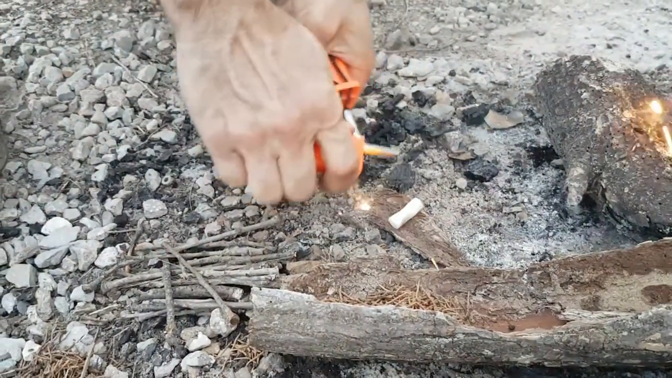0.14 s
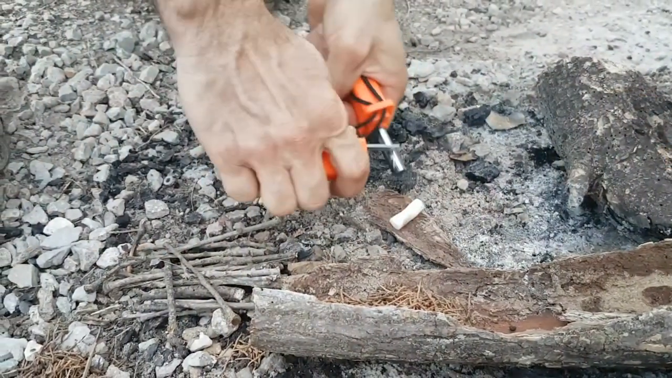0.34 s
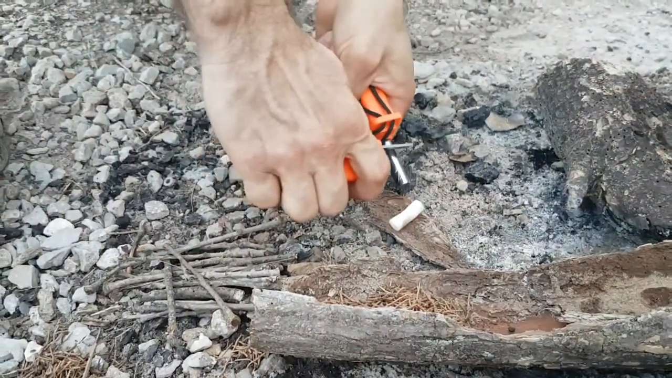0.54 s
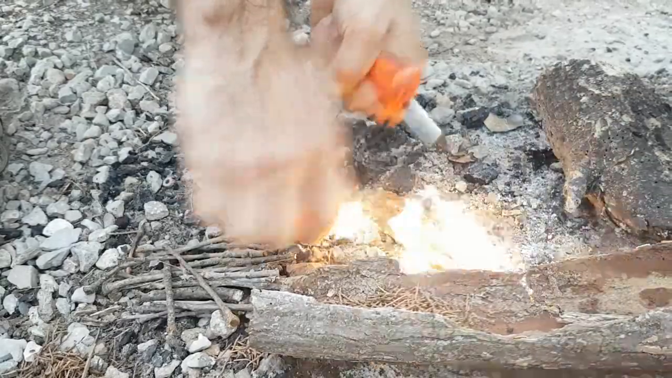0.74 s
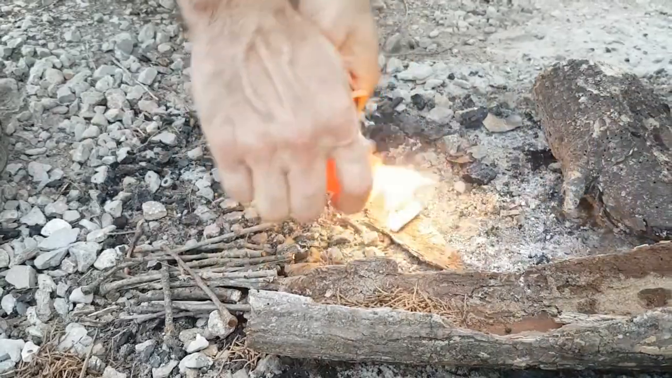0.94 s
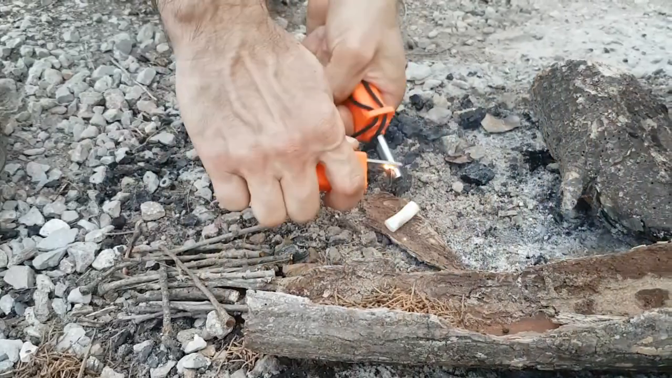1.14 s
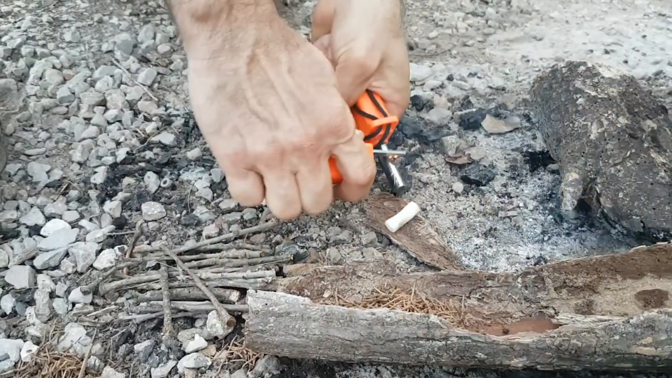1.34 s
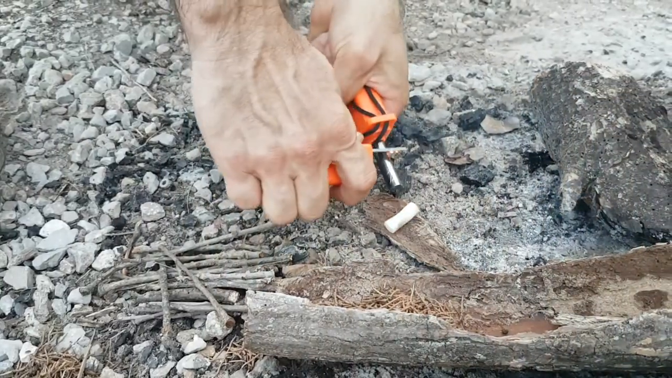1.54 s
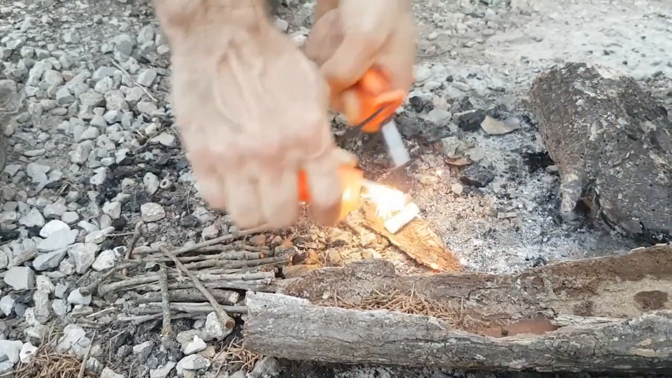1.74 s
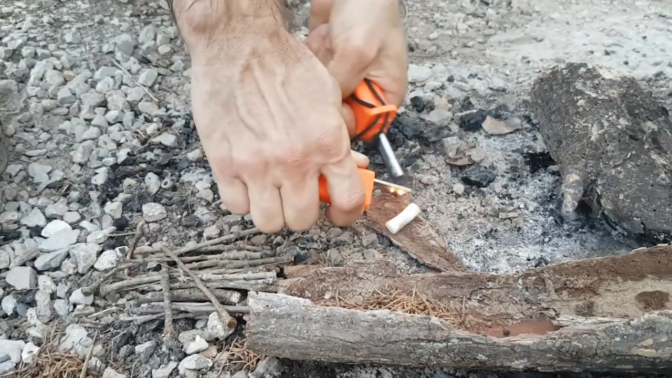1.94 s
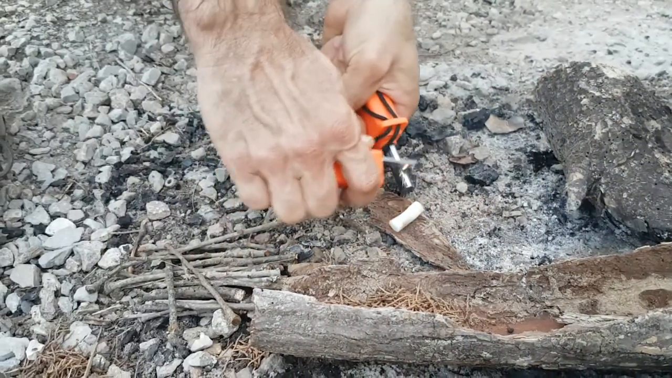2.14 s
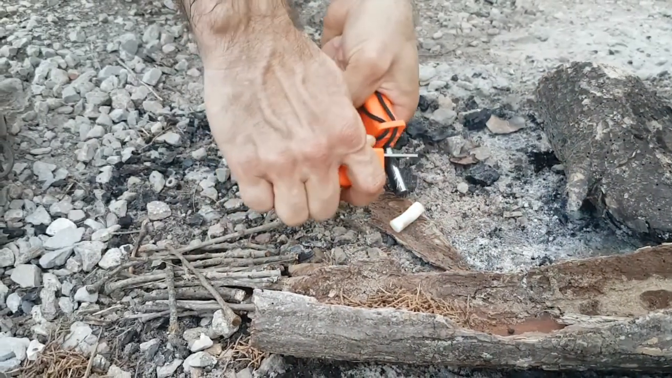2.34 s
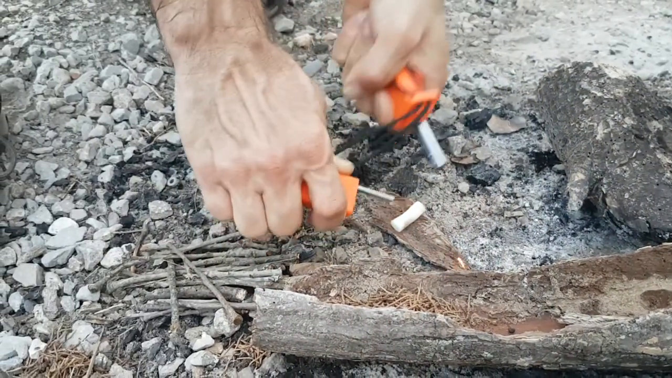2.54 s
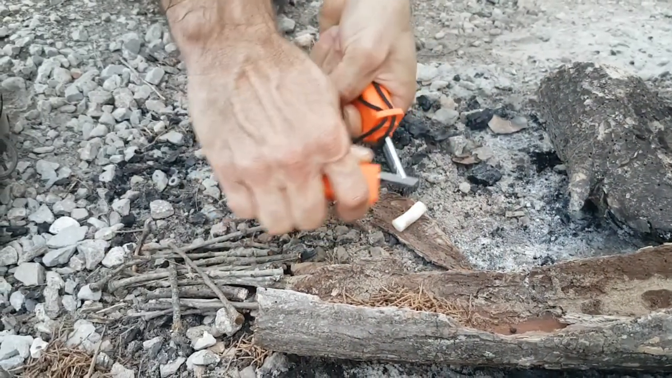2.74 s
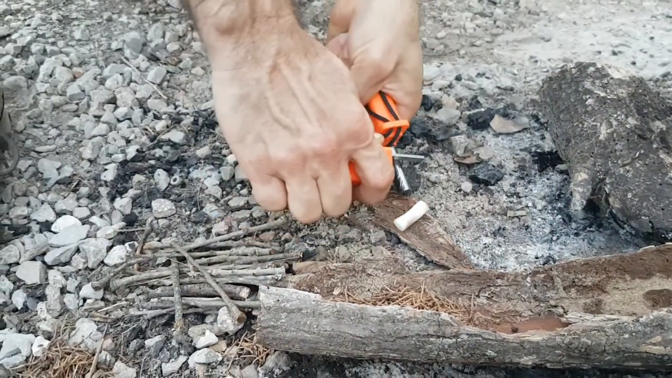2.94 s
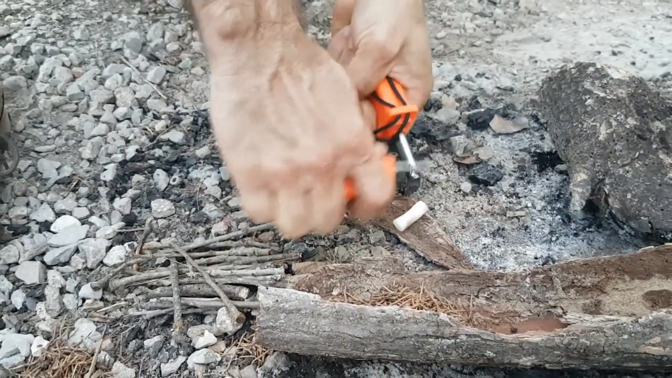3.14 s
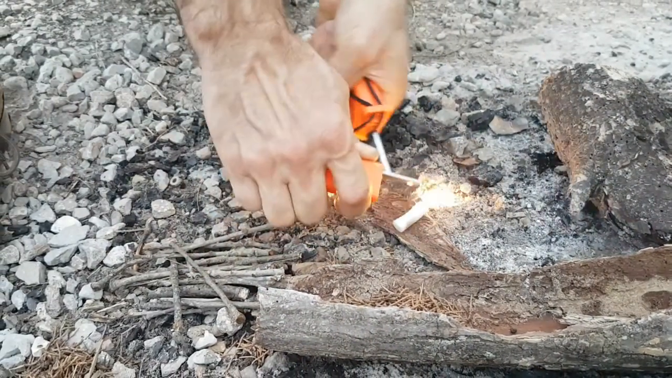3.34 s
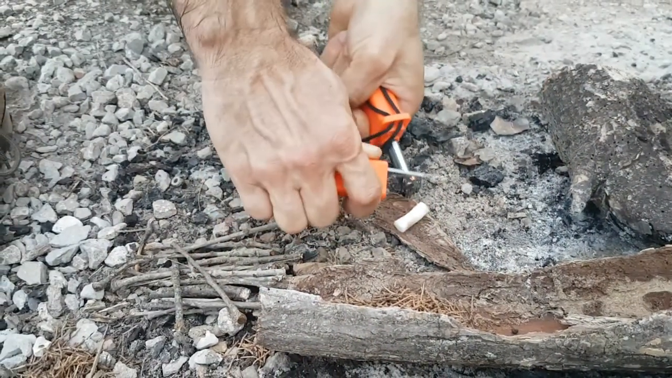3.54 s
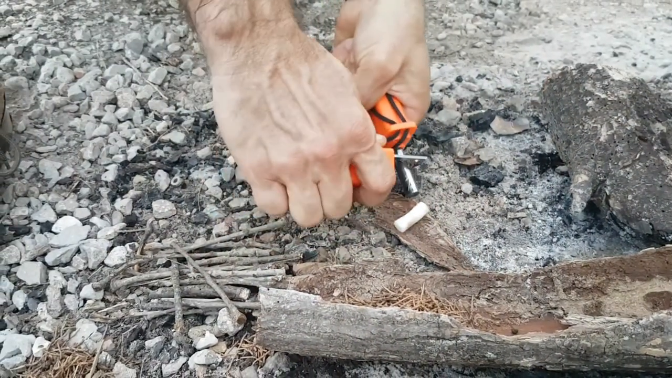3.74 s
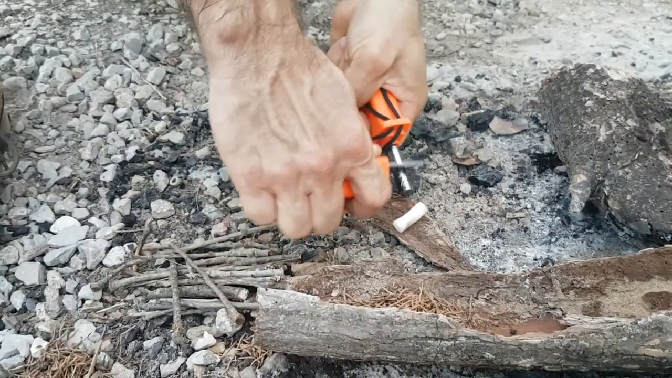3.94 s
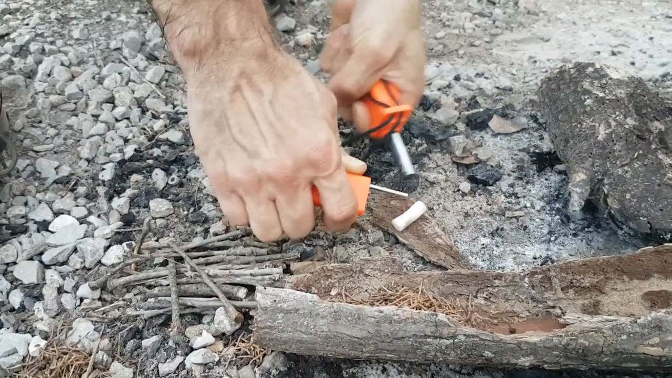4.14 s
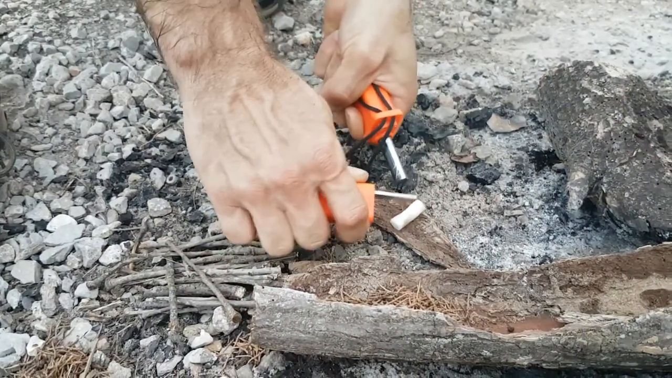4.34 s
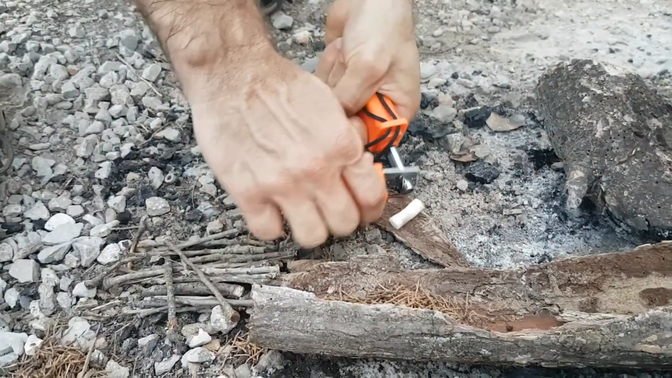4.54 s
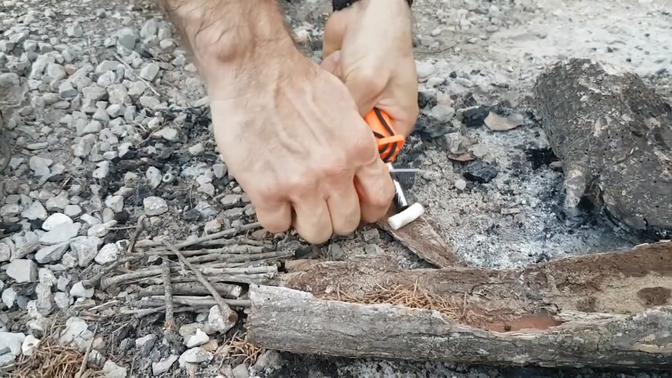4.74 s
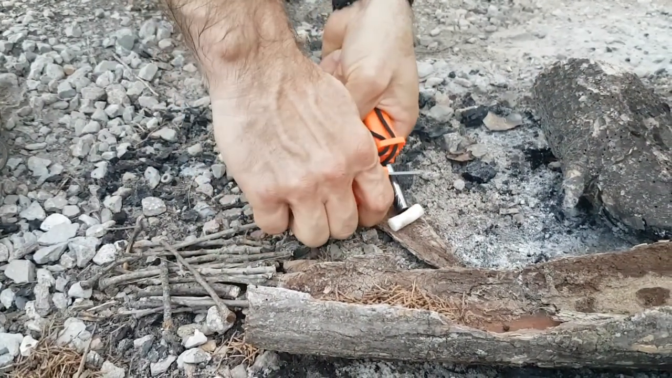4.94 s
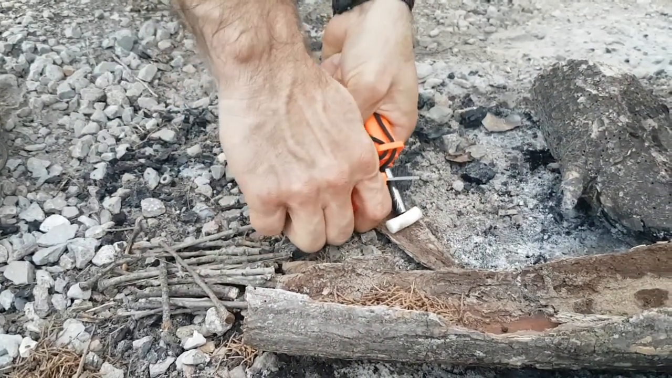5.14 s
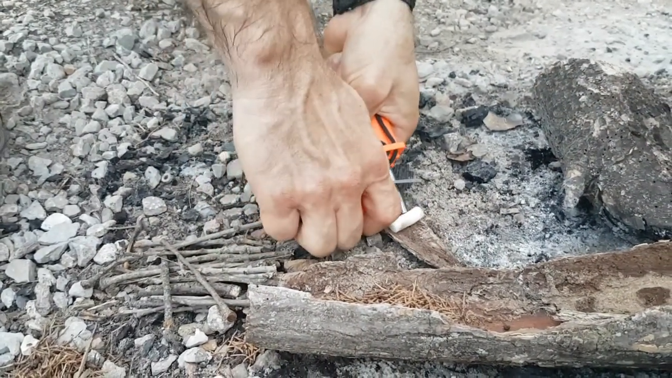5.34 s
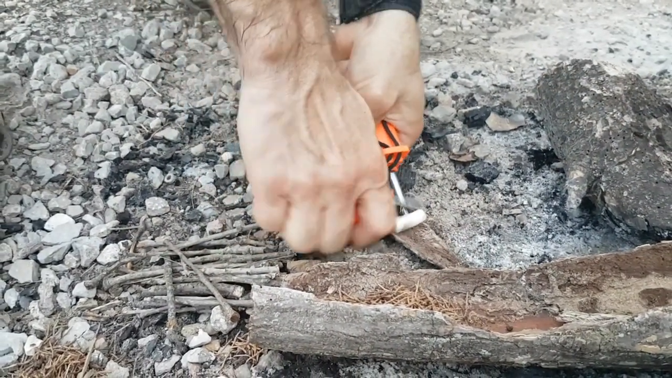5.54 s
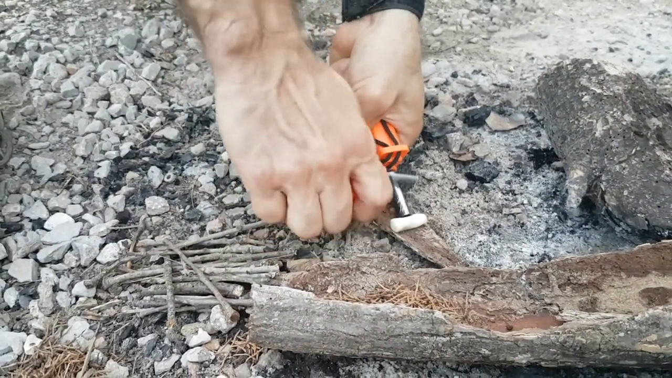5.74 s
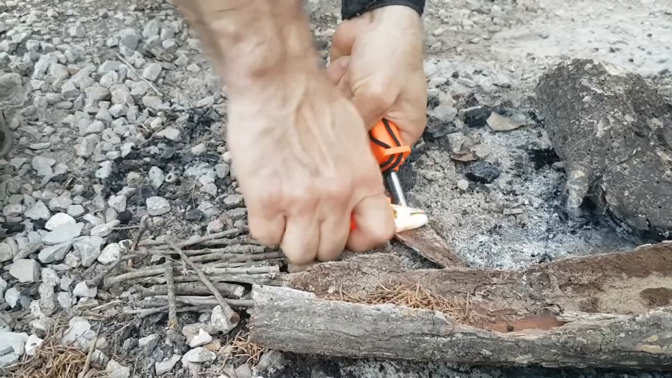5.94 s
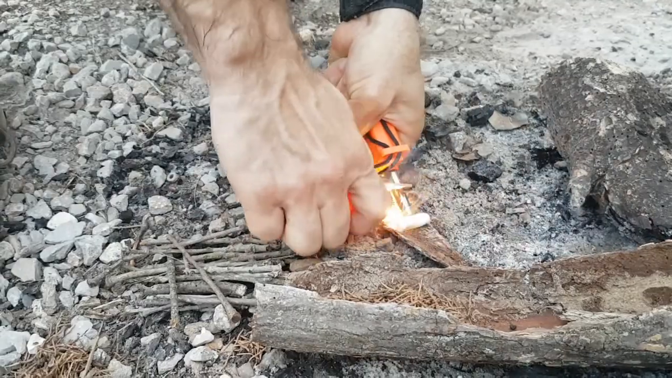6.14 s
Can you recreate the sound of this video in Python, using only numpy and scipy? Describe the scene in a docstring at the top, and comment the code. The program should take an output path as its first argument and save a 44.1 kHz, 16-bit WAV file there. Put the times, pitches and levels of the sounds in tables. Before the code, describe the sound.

Dry, loud metallic rasps, tens of milliseconds long, burst from a fire rod close to a stereo microphone, the loudest peaks slightly clipped. Each runs up to a snap and brief sputtering sparks. Small steel ticks and gritty handling noises fill the gaps. The open-air background holds a low engine drone, a swelling high insect chorus with a fast pulsed buzz, faint thin whistles and soft low air noise.

```python
"""At a cold fire pit a fire steel is struck again and again, close to the microphone, whose loudest peaks clip.
The striker ticks onto the rod, rasps along it and snaps off the tip: noise and grains ring steel and handles.
Shavings fizz and sputter as sparks (coloured grains), and the tools rub as they are lined up.
An engine idles some way off (sine lines of its cycle); insects shrill all round (coloured noise and a pulsed
buzz), with two thin whistles and a bed of low air noise."""
import sys
import numpy as np
from scipy import signal
from scipy.fft import rfft, irfft
from scipy.io import wavfile

SR = 44100
rng = np.random.default_rng(int(sys.argv[2]) if len(sys.argv) > 2 else 0)


def output_pcm(signal):
    """Save a mono or channel-first signal as 16-bit PCM at the path in sys.argv[1].

    Samples are clipped to [-1, 1] before scaling.
    """
    pcm = np.clip(np.atleast_2d(signal).T, -1, 1) * 32767
    wavfile.write(sys.argv[1], SR, np.round(pcm).astype(np.int16))


N = 277389
TIME = np.arange(N) / SR
BIN_HZ = np.arange(N // 2 + 1) / TIME[-1]


def from_db(db):
    """Amplitude ratio of a level in dB."""
    return 10 ** (np.asarray(db) / 20)


def rms_one(x):
    """Scale to rms 1 over all channels."""
    return x / np.sqrt(np.mean(x ** 2) + 1e-20)


def in_time(rows):
    """Interpolate each column of a (time [s], ...) curve at every sample."""
    time_s, *columns = np.transpose(rows)
    return [np.interp(TIME, time_s, column) for column in columns]


def panned(left_db):
    """Gains of the two channels for a left-right level difference."""
    return from_db([[left_db / 2], [-left_db / 2]])


def drift(rate_hz):
    """Low-passed noise of rms 1 that changes about rate_hz times a second."""
    spectrum = rfft(rng.standard_normal(N))
    return rms_one(irfft(spectrum / (1 + (BIN_HZ / rate_hz) ** 4), N))


def resonate(x, modes):
    """Parallel two-pole resonances (centre [Hz], width [Hz], level [dB]) with alternating signs."""
    out = 0
    for k, (hz, width_hz, db) in enumerate(modes):
        radius = np.exp(-np.pi * width_hz / SR)
        poles = [1, -2 * radius * np.cos(2 * np.pi * hz / SR), radius ** 2]
        ringing = signal.lfilter([1, 0, -1], poles, x + 1e-18)
        out = out + (-1) ** k * from_db(db) * (1 - radius ** 2) / 2 * ringing
    return out


def gliding(x, hz, width_hz):
    """A resonance whose centre follows the curve hz: shift down, low-pass, shift back; rms 1."""
    turn = np.exp(2j * np.pi * np.cumsum(hz) / SR)
    lowpass = signal.butter(2, width_hz / 2, fs=SR, output="sos")
    return rms_one((signal.sosfilt(lowpass, x / turn) * turn).real)


def coloured(x, spectrum):
    """Shape a white signal by (frequency [Hz], density [dB per Hz]); rms 1."""
    points_hz, points_db = np.transpose(spectrum)
    db = np.interp(np.log(BIN_HZ + 1), np.log(points_hz), points_db)
    return rms_one(irfft(rfft(x) * from_db(db), N))


MIC_SPACING_M = 0.23


def diffuse():
    """White noise from all round: alike at both microphones only for long waves."""
    alike = np.sinc(2 * BIN_HZ * MIC_SPACING_M / 343)  # 343 m/s: speed of sound
    mid, side = rfft(rng.standard_normal((2, N)))
    return irfft(np.sqrt(1 + alike) * mid + np.sqrt(1 - alike) * side * [[1], [-1]], N)


def grains(per_s, spread_db, scatter):
    """Random tiny fractures of uneven size, plus scatter off the stones that differs on each side; rms 1."""
    sizes = from_db(spread_db * np.minimum(rng.exponential(1, N), 4)) * rng.choice([-1, 1], N)
    fractures = rms_one(sizes * (rng.random(N) < per_s / SR))
    return rms_one(fractures + scatter * rng.standard_normal((2, N)))


def swell(peak_s, db, rise_s, fade_s):
    """Envelope of a burst that grows and dies exponentially."""
    decay = np.maximum((peak_s - TIME) / rise_s, (TIME - peak_s) / fade_s)
    return from_db(db) * np.exp(-np.minimum(decay, 20))


def together(envelopes):
    """Unrelated bursts add in power."""
    return np.sqrt(sum(e ** 2 for e in envelopes))


def arches(rows):
    """Envelope of rounded swells (middle [s], length [s], level [dB])."""
    return together(from_db(db) * np.sqrt(np.maximum(1 - (2 * (TIME - middle_s) / length_s) ** 2, 0))
                    for middle_s, length_s, db in rows)


def smooth_step(time_s, width_s):
    """Rise from 0 to 1 round time_s."""
    return .5 + .5 * np.tanh((TIME - time_s) / (2 * width_s))


# air noise spectrum: (frequency [Hz], density [dB per Hz])
AIR_COLOUR = [(20, -21), (32, -20), (45, -19), (58, -9), (100, -6.5), (180, -3.5), (300, -12), (500, -17.5),
              (800, -15.5), (1300, -27), (2200, -31), (4000, -25), (10000, -41), (16000, -36.5)]


def air(level_db=-33.0):
    """Steady diffuse noise, strongest in the bass."""
    return from_db(level_db) * coloured(diffuse(), AIR_COLOUR)


# firing rate of the four-cylinder engine: (time [s], rate [firings per s])
FIRING_RATE = [(0, 72.1), (6.29, 71.2)]
# firing tone, before firing_gain_db: (time [s], level [dB])
FIRING_LEVEL = [(0.0, -37), (0.05, -35), (0.21, -36.5), (0.46, -31), (0.51, -37), (2.24, -32.5),
                (2.29, -36), (2.71, -30), (3.24, -34), (3.28, -31.5), (3.73, -31), (3.85, -36.5),
                (4.75, -30.5), (4.99, -41.5), (5.46, -30), (6.29, -46)]
# exhaust lines: (multiple of the cycle rate [-], relative level [dB])
EXHAUST_LINES = [(5, -33), (7, -10.5), (8, -1.5), (9, -2.5), (11, -3), (12, -4), (13, -6.5), (15, -12.5),
                 (16, -18), (19, -25), (20, -19)]
EXHAUST_DB, EXHAUST_SINK_DB_PER_S = -29, 0.85  # overtones slowly recede
IDLE_WAVER = .17  # share by which each line wanders, rms


def engine(firing_gain_db=-0.25):
    """Four firings a cycle; the chuff of one stronger cylinder fills in lines between the firing harmonics."""
    firing_hz, = in_time(FIRING_RATE)
    firing_db, = in_time(FIRING_LEVEL)
    overtone_db = EXHAUST_DB - EXHAUST_SINK_DB_PER_S * TIME
    cycle_rad = 2 * np.pi * np.cumsum(firing_hz) / SR / 4
    firing = from_db(firing_db + firing_gain_db) * rms_one(np.sin(4 * cycle_rad))
    lines = 0
    for order, db in EXHAUST_LINES:
        smear_rad = rng.standard_normal()  # the exhaust pipe spreads each chuff in time
        waver = 1 + IDLE_WAVER * drift(2.0)
        lines = lines + from_db(db) * waver * np.sin(order * cycle_rad + smear_rad)
    return (firing + from_db(overtone_db) * rms_one(lines)) * panned(left_db=0.3)


# chorus swells: (middle [s], length [s], level [dB])
CHORUS_SWELLS = [(.8, 0.67, -34), (2.03, 0.57, -31), (3.48, 0.58, -31.5), (4.75, 0.9, -31.5),
                 (6.1, 0.73, -31.5)]
# chorus spectrum: (frequency [Hz], density [dB per Hz])
CHORUS_COLOUR = [(1500, -32), (2800, -17.5), (3500, -4.5), (4200, -1), (5200, -1), (6000, 3.5),
                 (6800, -1.5), (8100, -1.5), (8800, -10.5), (9600, -23.5)]
# resonances of the nearest insect: (centre [Hz], width [Hz], relative level [dB])
NEAR_INSECT = [(5098, 35, -1), (6670, 370, -17), (7238, 55, 3), (7410, 120, 1.5), (8160, 460, -9)]
CHORUS_DB = -34.5  # floor under the swells
PULSE_DEPTH = .7


def insects(flutter_db=1.1, near_db=-37.5):
    """A far chorus swells and ebbs; one nearer insect buzzes in quick even pulses."""
    level = together([from_db(CHORUS_DB), arches(CHORUS_SWELLS)])
    chorus = level * from_db(flutter_db * drift(52)) * coloured(diffuse(), CHORUS_COLOUR)
    pulse_hz = 38.2 + .15 * drift(1.5)
    pulses = 1 + PULSE_DEPTH * np.sin(2 * np.pi * np.cumsum(pulse_hz) / SR)
    buzz = resonate(diffuse() * pulses, NEAR_INSECT)
    band = signal.butter(4, [4200, 8800], "band", fs=SR, output="sos")
    buzz = rms_one(signal.sosfilt(band, buzz))
    return chorus * panned(left_db=-3.0) + from_db(near_db) * buzz * panned(left_db=1.0)


# fallen shavings flare up: (peak time [s], relative level [dB], fade [s])
FLARES = [(.014, -9.5, 0.0093), (.07, -22, 0.049), (0.805, -17, 0.035), (.882, -24, 0.031),
          (.99, -20.5, 0.023), (1.04, -24.5, .022), (1.784, -23.5, 0.038), (3.25, -22.5, .058),
          (3.397, -26, 0.0092), (5.523, -20, 0.0041), (6.06, -21, 0.069)]
# spark spectrum: (frequency [Hz], density [dB per Hz])
SPARK_COLOUR = [(20, -40), (90, 7), (300, 7), (700, 6.5), (1500, 3.5), (2600, -1.5), (4500, 3), (7000, 3.5),
                (9500, -2.5), (13000, 0), (16000, -4)]
FLARE_RISE = 0.89  # rise as a share of the fade
SHOWER_RISE_S, SHOWER_FADE_S = 0.028, 0.027


def sparks(sputter_db=2.0, sputter_hz=90):
    """Shavings burn in a broad, uneven fizz: a shower round every row of SNAPS, and stray flares on the ground."""
    showers = [swell(time_s, db, SHOWER_RISE_S, SHOWER_FADE_S) for time_s, *_, db in SNAPS]
    flares = [swell(peak_s, db, FLARE_RISE * fade_s, fade_s) for peak_s, db, fade_s in FLARES]
    fizz = coloured(grains(per_s=7100, spread_db=4.0, scatter=0.58), SPARK_COLOUR)
    sputter = from_db(sputter_db * drift(sputter_hz))
    return together(showers + flares) * fizz * sputter * panned(left_db=-0.2)


def blow(modes, fade_s, chatter, size=4096):
    """One blow: a sharp contact, then a few ms of chatter and faint scatter; rms 1 over 10 ms."""
    t = np.arange(size) / SR
    dying = np.exp(-t / fade_s) + from_db(-23) * np.exp(-t / .007)
    shared, *own = rng.standard_normal((3, size))
    push = (t == 0) + chatter * (shared + np.array(own)) / 2 * dying
    sound = resonate(push, [mode[:3] for mode in modes])
    return sound / np.sqrt(np.mean(np.sum(sound ** 2, axis=1)) / (SR / 100))


# resonances of rod and striker: (centre [Hz], width [Hz], struck [dB], scraped [dB])
STEEL = [(1500, 1060, -10, -27.5), (2180, 44, -12.5, -55), (2500, 130, -13, -16.5), (3210, 140, 1, -13),
         (4094, 370, 1, 2), (4570, 520, -3, -1), (4970, 140, 3, 0), (6250, 870, 0, -5),
         (8400, 290, -10, -11), (10100, 660, -26, -9), (14400, 1800, -34, -14)]
# resonances of the handles in the fists: (centre [Hz], width [Hz], struck [dB], scraped [dB])
HANDLES = [(546, 43, 2, -9), (822, 180, 6, -31.5), (1126, 300, 4.5, 4), (1310, 324, 1, 8)]


def strike(time_s, ring_db, contact_hz, crack_db, knock_db, chatter_s, contact_db=-6.5, contact_width_hz=1000):
    """The edge cracks, steel rings briefly with a note set by where it is hit, and the handles knock."""
    ring = blow(STEEL, chatter_s, chatter=0.55)
    contact = from_db(contact_db) * blow([(contact_hz, contact_width_hz, 0)], chatter_s, chatter=1.0)
    crack = blow([(11500, 11000, 0)], 0.8 * chatter_s, chatter=0.52)
    knock = blow(HANDLES, 2 * chatter_s, chatter=.16)
    edge = from_db(ring_db) * (ring + contact) + from_db(crack_db) * crack
    hit = edge * panned(left_db=-0.5) + from_db(knock_db) * knock * panned(left_db=0.3)
    return np.pad(hit, [(0, 0), (round(time_s * SR), N)])[:, :N]


# striker touches the rod; levels relative:
# (time [s], steel ring [dB], contact note [Hz], crack [dB], handle knock [dB], chatter [s])
TICKS = [(.328, -10.5, 3740, -17, -33, .0008), (.3802, -24, 4050, -50, -42, .001),
         (.452, -14, 6000, -47, -34, 0.0021), (.946, -26, 2630, -39, -29, 0.0034),
         (1.2198, -25.5, 6040, -52, -34, .0005), (2.2109, -21.5, 6140, -55, -30.5, 0.0015),
         (2.9118, -6, 6400, -23, -39, .0015), (5.4481, -15.5, 5760, -22, -21, .0008),
         (5.4873, -24, 4240, -28, -24, .003), (5.7809, -11.5, 4280, -49, -29.5, 0.002),
         (6.1583, -6.5, 4000, -19, -24.5, .0019)]
# striker snaps off the tip, once rebounding at once (1.679 s), and sparks fly; levels relative:
# (time [s], steel ring [dB], contact note [Hz], crack [dB], handle knock [dB], sparks [dB])
SNAPS = [(0.7779, -4, 4870, -22, -35, -19.5), (1.660, -8, 5000, -13, -17, -16),
         (1.679, -17, 2300, -16.5, -18, -14), (2.472, -10, 6100, -20, -16, -20.5),
         (3.2069, -9.5, 2850, -23, -13.5, -19.5), (4.04, -9, 5300, -15.5, -14, -26.5),
         (5.5969, -15.5, 4600, -28, -30, -21), (5.966, -24, 5000, -33, -27, -22)]
SNAP_CHATTER_S = 0.0021


def blows():
    """Ticks as the striker touches the rod, snaps as it leaves the tip, one with a rebound."""
    ticks = sum(strike(*tick) for tick in TICKS)
    snaps = sum(strike(*snap, SNAP_CHATTER_S) for *snap, _ in SNAPS)
    return ticks + snaps


# fingers and handles shuffle: (peak time [s], relative level [dB], fade [s])
RUBS = [(.392, -28, .014), (.468, -28, .011), (1.31, -31, 0.048), (3.60, -27.5, .027), (3.68, -21.5, 0.024),
        (4.45, -28, 0.016), (4.595, -24.5, 0.025), (5.73, -25.5, 0.099)]
# rub spectrum: (frequency [Hz], density [dB per Hz])
RUB_COLOUR = [(200, 15.5), (700, -9), (1300, 4.5), (1900, 1), (2500, -5), (3300, 5), (5000, -43),
              (9000, -30), (16000, -28)]
RUB_RISE = 0.77  # rise as a share of the fade


def handling(rough_db=2, rough_hz=110):
    """Dull gritty rubbing as the tools are lined up again."""
    grit = coloured(grains(per_s=2500, spread_db=2.0, scatter=.7), RUB_COLOUR)
    level = together(swell(peak_s, db, RUB_RISE * fade_s, fade_s) for peak_s, db, fade_s in RUBS)
    return level * grit * from_db(rough_db * drift(rough_hz))


# strokes along the rod; levels relative: (start [s], time to bite [s], end [s], level at the bite [dB],
# level at the tip [dB], hollow handle tone [dB], squeal at the tip [Hz])
STROKES = [(.734, .003, 0.78, -21, -9, -24, 4200), (1.598, .0015, 1.662, -19, -17.5, -18, 5340),
           (2.408, .002, 2.474, -17.5, -19.5, -17, 5370), (3.153, .006, 3.209, -17.5, -22, -17, 5240),
           (3.97, .004, 4.04, -17, -15, -14, 5360), (5.481, .002, 5.604, -25, -8, -2.5, 4400),
           (5.923, .002, 5.976, -18, -24, -7, 4730), (6.158, .001, 6.185, -21.5, -24.5, -15, 4270)]
LET_GO_S = 0.0031  # time for the edge to let go
EASE_DB, TIP_SHARE = 3.5, .19  # pressure eases over a stroke; level bends to the tip's over this last share
SQUEAL_HZ, CLIMB_S, GLIDE_S = 4440, .025, .003  # resting note; glide to the tip's: lead before end, width


def scraping(chatter_hz=170, chatter_db=1.5, uneven_db=0.8, squeal_db=1.5, steel_db=-1.5, hollow_loss_db=4):
    """The edge bites, eases and runs to the tip, sticking and slipping; steel and handles ring, a squeal glides."""
    force, hollow = np.zeros((2, N))
    note_hz = np.full(N, float(SQUEAL_HZ))
    for start, bite_s, end, bite_db, tip_db, hollow_db, tip_hz in STROKES:
        contact = smooth_step(start, bite_s) * np.clip((end - TIME) / LET_GO_S + .5, 0, 1)
        run_db = np.interp(TIME, [start, end], [bite_db, bite_db - EASE_DB])
        near_tip = np.exp(np.clip((TIME - end) / (TIP_SHARE * (end - start)), -20, 0))
        stroke = contact * from_db(run_db + near_tip * (tip_db - run_db))
        force += stroke
        hollow += stroke * from_db(hollow_db - hollow_loss_db * near_tip)
        note_hz += (tip_hz - SQUEAL_HZ) * smooth_step(end - CLIMB_S, GLIDE_S) * (TIME < end + LET_GO_S)
    chatter = from_db(chatter_db * drift(chatter_hz))
    slips = rms_one(grains(per_s=6400, spread_db=4.5, scatter=0.94) * chatter)
    scraped = [0, 1, 3]  # columns: centre, width, scraped level
    steel = rms_one(resonate(slips, np.array(STEEL)[:, scraped]))
    handles = rms_one(resonate(slips, np.array(HANDLES)[:, scraped]))
    squeal = gliding(grains(per_s=9000, spread_db=4.0, scatter=0.24), note_hz, width_hz=680)
    rasp = force * (from_db(steel_db) * steel + from_db(squeal_db) * squeal) * panned(left_db=-4.0)
    return (rasp + hollow * handles * panned(left_db=2.0)) * from_db(uneven_db * drift(70))


# thin far whistles, perhaps a bird: (middle [s], length [s], level [dB])
WHISTLES = [(4.24, .24, -44.5), (5.32, .18, -43)]
# tones in each whistle: (frequency [Hz], relative level [dB])
WHISTLE_TONES = [(3320, -1), (3600, -4), (5150, 0)]


def whistles(waver_hz=18):
    """Faint tones, wavering in pitch, that fade in and out."""
    tones = 0
    for hz, db in WHISTLE_TONES:
        phase_rad = 2 * np.pi * np.cumsum(hz + waver_hz * drift(57)) / SR
        tones = tones + from_db(db) * np.sin(phase_rad)
    return arches(WHISTLES) * rms_one(tones)


# reflections off stones and bark: (left delay [ms], right delay [ms], level [dB])
REFLECTIONS = [(1.25, 1.42, -27), (2.3, 1.95, -19), (3.7, 4.4, -18.5)]


def fire_pit(x, right_lag_ms=.023):
    """Direct sound reaches the left microphone a hair earlier; close reflections follow."""
    def late(channel, ms):
        """Delay by whole samples, as sound does over a longer path."""
        return np.interp(TIME - np.round(ms * SR / 1000) / SR, TIME, channel, left=0)
    out = np.array([x[0], late(x[1], right_lag_ms)])
    for left_ms, right_ms, db in REFLECTIONS:
        out += from_db(db) * np.array([late(x[0], left_ms), late(x[1], right_ms)])
    return out


def scene():
    """Tools in the fire pit over engine, insects, whistles and air."""
    tools = sparks() + blows() + handling() + scraping()
    return air() + engine() + insects() + from_db(-3.5) * fire_pit(tools) + whistles()


CUTOFF_HZ = 16000


def record(dry):
    """Roll off the deepest bass, clip the loudest peaks flat, cut the top."""
    highpass = signal.butter(3, 36, "high", fs=SR, output="sos")
    lowpass = signal.ellip(10, .1, 80, CUTOFF_HZ, fs=SR, output="sos")
    clipped = np.clip(signal.sosfilt(highpass, dry), -1, 1)
    return signal.sosfilt(lowpass, clipped)


dry = scene()
out = record(dry)
output_pcm(out)
```